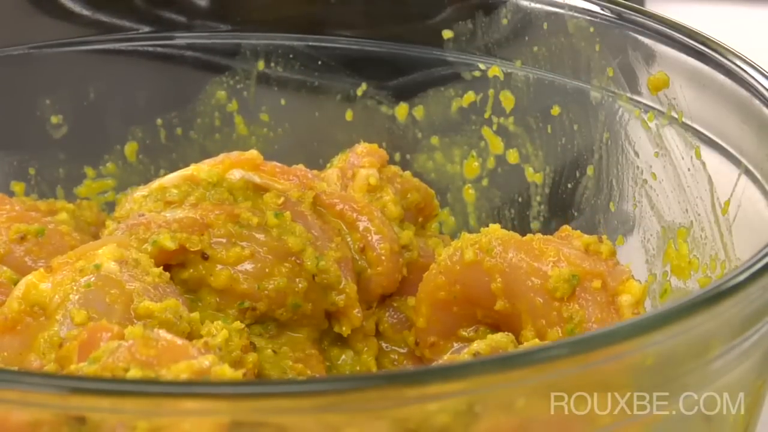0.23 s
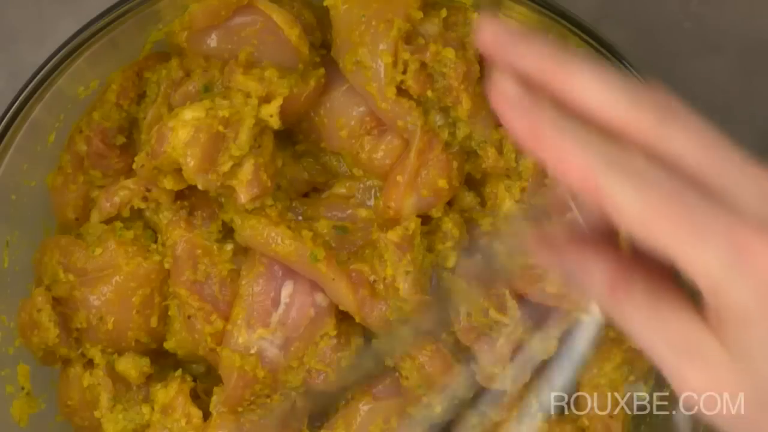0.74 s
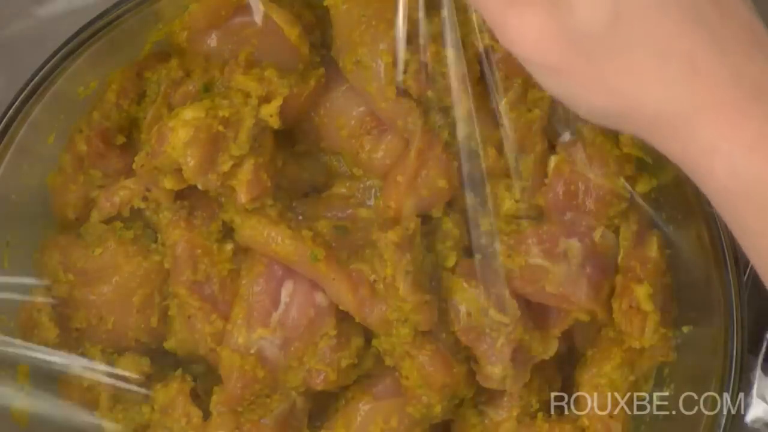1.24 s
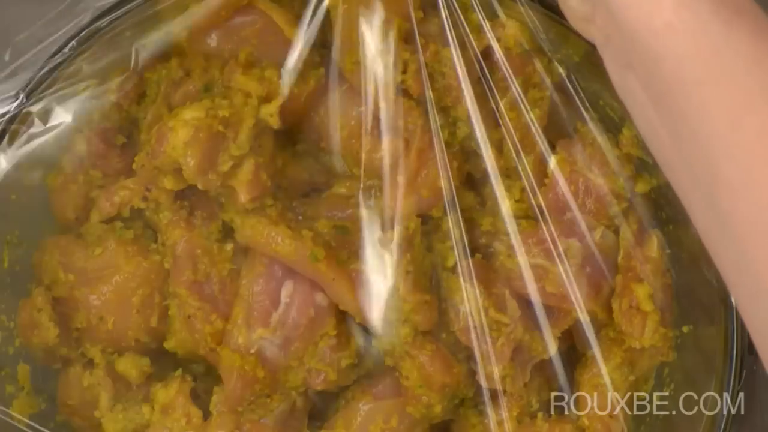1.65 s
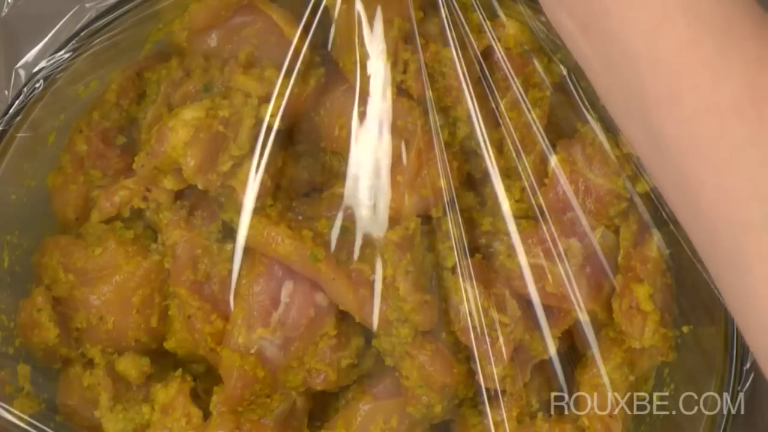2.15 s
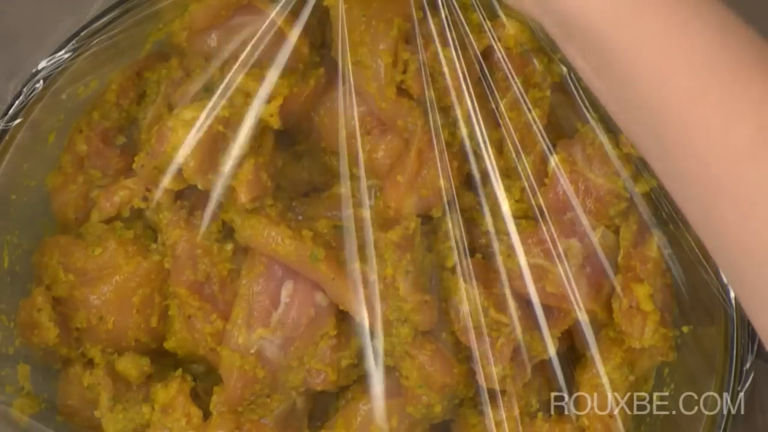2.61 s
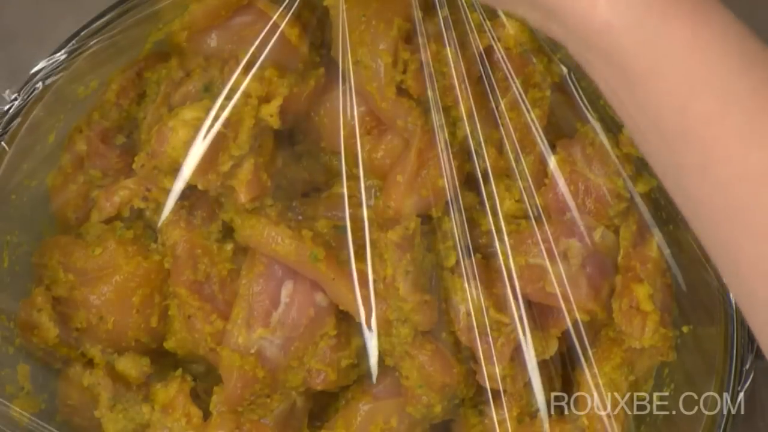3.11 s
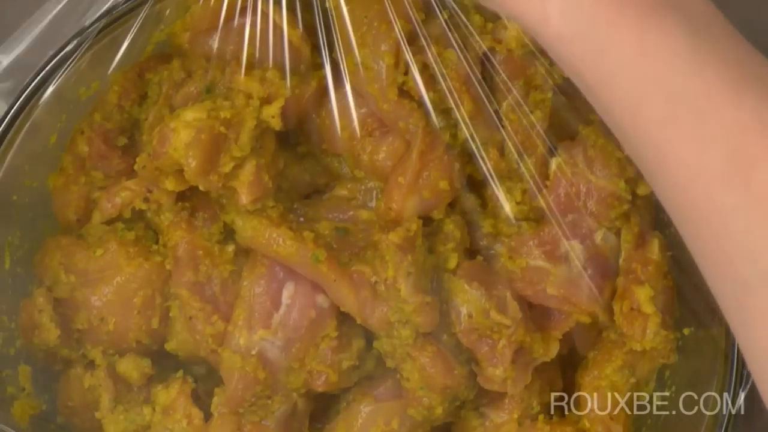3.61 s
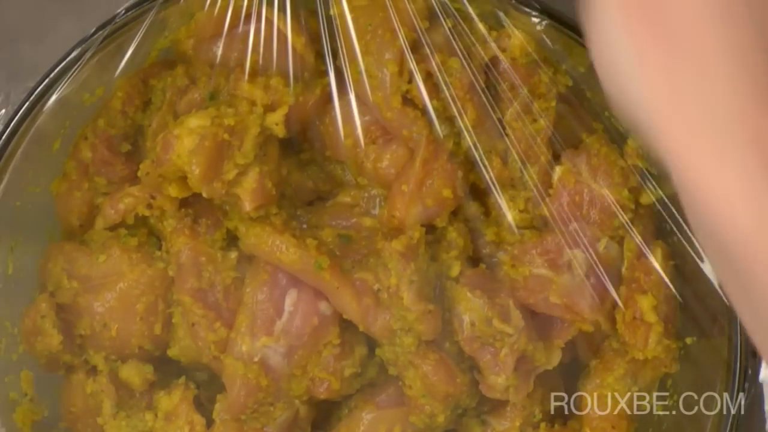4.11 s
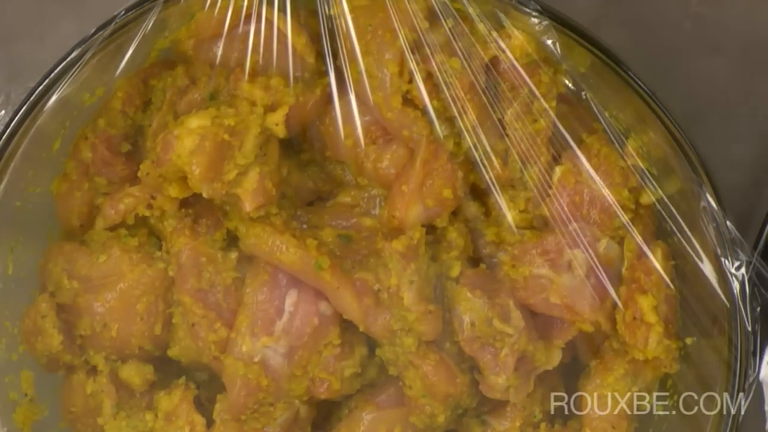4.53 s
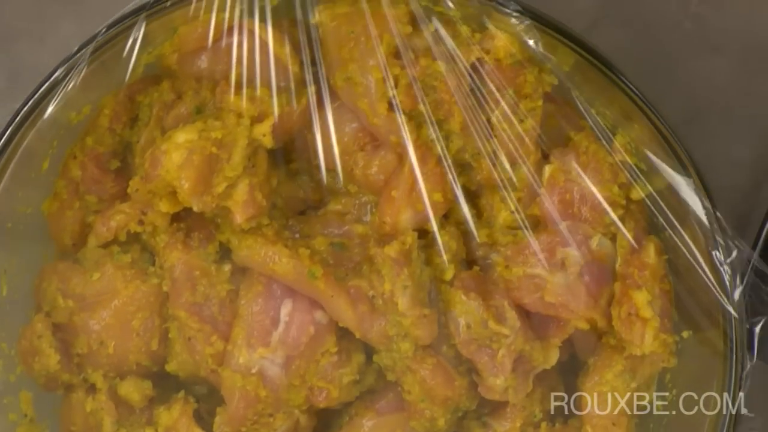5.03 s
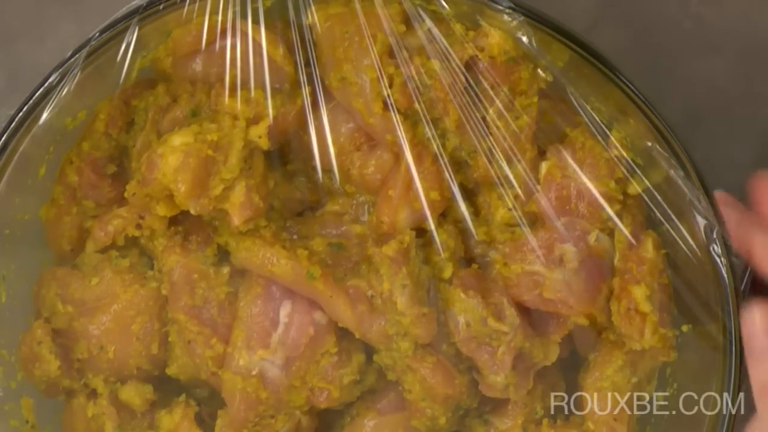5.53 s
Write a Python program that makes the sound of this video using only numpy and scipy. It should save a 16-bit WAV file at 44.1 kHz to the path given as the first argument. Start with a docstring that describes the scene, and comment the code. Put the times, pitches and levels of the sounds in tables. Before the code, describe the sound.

A quiet small kitchen, heard close to a glass bowl. For the first second there is only soft room air and fan noise, with a low rumble and hum entering near 0.4 s, plus faint moist smacks and brushes of food. From 1.3 s thin plastic film begins a light, bright crackle with small snaps. Between 2 and 2.8 s the rustling grows busier, with faint hoarse drags on the rim. After a short lull, from 3.1 s it surges; the loudest crunch, at 3.3 to 3.55 s, is a dense cluster of sharp snaps with hollow pops and a dull thump. Separate snaps follow, and the taut film booms softly like a drum at 3.9 s. A smaller flurry comes at 4.6 to 4.9 s, short twangs around 5 s, then sparse crinkles, soft bumps and very faint glass taps until the end. The room echo is short and subdued.

```python
"""A quiet kitchen: after a few soft sounds of moist food, cling wrap is pulled over a glass bowl, close by.
The film rustles in tiny random buckles; larger creases snap as noisy flips with a hollow pop, loudest at the rim.
Damped modes let the taut film answer like a slack drum skin and the glass ring; filtered noise makes
dull bumps, hoarse drags and moist smacks. Room air, a fan, a low rumble and an appliance hum lie beneath."""
import sys
import numpy as np
from scipy import signal
from scipy.fft import rfft, irfft, next_fast_len
from scipy.io import wavfile
from scipy.ndimage import map_coordinates

SR = 44100
rng = np.random.default_rng(int(sys.argv[2]) if len(sys.argv) > 2 else 0)


def unload_audio(sound):
    """Save the sound as a 16-bit wav file, at the path given as the first command line argument."""
    columns = np.transpose(np.atleast_2d(sound))
    # keep every value between -1 and 1, then stretch to whole-number steps
    steps = np.round(np.clip(columns, -1, 1) * 32767)
    wavfile.write(sys.argv[1], SR, steps.astype(np.int16))


N = 254016  # length in samples


def amp(db):
    """Decibels to gain."""
    return 10 ** (np.asarray(db) / 20)


def unit(x):
    """Scale to rms 1."""
    return x / np.sqrt(np.mean(x ** 2) + 1e-20)


def along(points, hz):
    """Read (Hz, value) points on a log frequency axis."""
    f, v = np.transpose(points)
    return np.interp(np.log(hz + 1), np.log(f + 1), v)


def curves(rows):
    """One value per sample for each column after the time."""
    s, *cols = np.transpose(rows)
    return [np.interp(np.arange(N) / SR, s, c) for c in cols]


def wobble(rate):
    """A random curve of straight segments, rate knots a second."""
    knots = rng.standard_normal(int(N * rate / SR) + 4)
    return map_coordinates(knots, [np.arange(N) * rate / SR], order=1)


def colour(x, shape_db):
    """Causal minimum-phase filter whose gain in dB is a function of frequency."""
    size = 2 * next_fast_len(len(x) // 2 + 2048, True)
    cepstrum = irfft(np.log(amp(shape_db(np.fft.rfftfreq(size, 1 / SR))) + 1e-6))
    # fold the cepstrum forward in time so that nothing sounds early
    cepstrum[1:size // 2] *= 2
    cepstrum[size // 2 + 1:] = 0
    return irfft(rfft(x, size) * np.exp(rfft(cepstrum)))[:len(x)]


def tinted(x, points):
    """x coloured by (Hz, dB) points, at rms 1."""
    return unit(colour(x, lambda hz: along(points, hz)))


def resonance_db(hz, centre, width):
    """Gain of a steep-sided resonance."""
    return -20 * np.log10(1 + ((hz ** 2 - centre ** 2) / (width * hz + 1e-6)) ** 2)


def burst(x, seconds):
    """Scale x to the energy of a unit signal of that length."""
    return x * np.sqrt(seconds * SR / (np.sum(x ** 2) + 1e-20))


def add(track, s, x):
    """Mix x into the track at time s."""
    start = max(round(s * SR), 0)
    track[start:start + len(x)] += x[:max(N - start, 0)]


def ring(modes):
    """Damped modes, at slightly new strengths and random phases for every blow."""
    t = np.arange(SR) / SR
    total = 0
    for hz, db, t60 in modes:
        decay = amp(db + rng.normal(0, 1.5) - 60 * t / t60)
        total = total + decay * np.sin(2 * np.pi * hz * t + rng.uniform(0, 2 * np.pi))
    return total


def ringing(x, modes):
    """Answer of damped modes to x, of unit energy gain."""
    answer = ring(modes)
    return signal.fftconvolve(x, answer / np.linalg.norm(answer))[:N]


# faint creak of the held film, before the trims in crinkling: time_s, crinkle_db, drum_db
HELD_CREAK = [(1.23, -87, -87), (1.29, -72, -70), (2.02, -73.5, -73), (2.45, -62, -68), (3.0, -67.5, -64.5),
              (4.1, -69.5, -63.5), (4.36, -77, -70.5), (5.4, -65.5, -65), (5.75, -66.5, -66.5)]
# pulls and presses of the hands, before the same trims: start_s, length_s, crinkle_db, drum_db
PULLS = [(1.303, 0.035, -56, -51), (1.358, .11, -60, -63), (1.53, 0.32, -60.5, -63.5),
         (1.668, 0.037, -54, -52), (1.903, 0.0081, -55.5, -66), (2.076, 0.064, -54, -60),
         (2.172, .11, -51, -60.5), (2.337, .055, -50, -58), (2.51, .11, -48.5, -56.5),
         (2.674, 0.083, -48.5, -53.5), (2.818, 0.068, -54, -58), (3.081, 0.033, -52.5, -62.5),
         (3.176, .1, -49.5, -53), (3.331, 0.11, -44, -48), (3.468, 0.024, -38.5, -40),
         (3.513, 0.12, -45.5, -44), (3.65, 0.11, -52.5, -56), (3.785, 0.029, -47, -50),
         (3.913, .09, -60.5, -62), (4.019, .06, -53.5, -70), (4.466, .16, -64, -64),
         (4.657, 0.02, -44.5, -58), (4.736, 0.14, -58, -52), (4.971, 0.072, -54, -56),
         (5.371, 0.028, -66.5, -62.5), (5.737, .03, -61, -65)]
ATTACK_S, RELEASE_S = 0.017, .024  # amplitude time constants of every pull


def handling():
    """Crinkle and drumming levels in dB: each pull takes hold, lasts and dies away over the held creak."""
    t = np.arange(N) / SR
    power = amp(curves(HELD_CREAK)) ** 2
    for s, length, crinkle_db, drum_db in PULLS:
        before, after = np.minimum(t - s, 0), np.maximum(t - s - length, 0)
        shape = np.exp(before / ATTACK_S - after / RELEASE_S)
        power = power + (amp([[crinkle_db], [drum_db]]) * shape) ** 2
    return 10 * np.log10(power)


def buckles(rate, spread_db, clump_db):
    """Random tiny impulses of widely varying size, in clumps; mean power does not depend on the rate."""
    hit = rng.random(N) < rate / SR
    scatter_db = spread_db * np.clip(rng.standard_normal(N), -2, 2)
    size_db = scatter_db + clump_db * np.clip(wobble(170), -2, 2)
    return unit(hit * np.sign(rng.standard_normal(N)) * amp(size_db) / np.sqrt(rate))


# spectrum of the film's crackle: freq_hz, gain_db
CRINKLE_COLOUR = [(200, -20), (600, -14), (1400, -1.5), (2000, -1), (2500, -3), (3200, -4.5), (4200, -3.5),
                  (5400, -2.5), (7500, -1), (10000, -2), (13000, -4), (16000, -7.5)]
# spectrum of the drumming sheet: freq_hz, gain_db
DRUM_COLOUR = [(60, -27.5), (200, -5), (350, -3), (550, 5), (800, 1.5), (1100, 5), (1500, -2.5),
               (2200, -4.5), (3500, -28), (8000, -64.5)]
# gain of the finest crackle, which fades as the film is smoothed down: time_s, gain_db
SHEEN_GAIN = [(1.3, 3), (3.5, -.5), (4.1, 3.5), (4.6, -6), (5.7, -11)]
SHEEN_HZ = 9800  # the finest buckles sound above this
# buckle rate at that crinkle level; it doubles with every step louder
BUCKLES_PER_S, BUCKLES_AT_DB, DOUBLING_DB = 2600, -50, 7


def crinkling(crinkle_db, drum_db):
    """Tiny buckles crackle and set the whole sheet drumming."""
    rate = BUCKLES_PER_S * 2 ** ((crinkle_db - BUCKLES_AT_DB) / DOUBLING_DB)
    sheen_db, = curves(SHEEN_GAIN)
    grains = buckles(rate, spread_db=4.5, clump_db=4.5)
    # facets of different sizes each favour their own pitch
    facets = 0
    for centre in (1980, 4270, 6810, 9500, 13000):
        facet = buckles(rate / 4, spread_db=5.5, clump_db=3.5)
        facets = facets + unit(colour(facet, lambda hz: resonance_db(hz, centre, centre * .8)))
    # the film clings to the glass and lets go in quick, uneven slips
    slips = unit(amp(2.8 * np.clip(wobble(110), -2, 1.5)))
    crackle = slips * (grains + amp(-11) * facets)
    fizz = tinted(crackle + amp(-8) * rng.standard_normal(N), CRINKLE_COLOUR)
    # coarser folds carry less of the top sheen
    highpass = signal.butter(2, SHEEN_HZ, "high", fs=SR, output="sos")
    fizz = fizz + (amp(sheen_db) - 1) * signal.sosfiltfilt(highpass, fizz)
    drum = tinted(slips * grains + amp(-5.5) * rng.standard_normal(N), DRUM_COLOUR)
    return amp(crinkle_db - 1.0) * fizz + amp(drum_db - 4.5) * drum


# large creases that snap: start_s, level_db, pop_db (relative to the crack), crease_hz (its resonance)
LARGE_CREASES = [(1.3629, -49, -31, 8800), (1.406, -54, -20, 8500), (1.456, -54, -14, 8000),
                 (1.548, -49.5, -17, 7100), (1.561, -50.5, -14, 7500), (1.672, -43.5, -6, 8500),
                 (1.6826, -50, 2.5, 8200), (1.7389, -50, -22, 2800), (1.7992, -53, -18, 6740),
                 (1.818, -50, -8, 8000), (1.9597, -53.5, -18, 13700), (2.0183, -60, -16, 5900),
                 (2.3743, -39.5, -29, 12200), (2.4974, -50.5, -26, 10000), (2.6158, -44, -26, 9300),
                 (2.677, -48, -1.5, 9000), (2.704, -44, -12, 7500), (2.7135, -44, -3.5, 10500),
                 (2.7651, -40.5, -33, 11600), (3.106, -44, -25, 9200), (3.1695, -38.5, -8.5, 6650),
                 (3.237, -41.5, -27, 9500), (3.2981, -37, -7, 4240), (3.3003, -31, -8, 4400),
                 (3.3192, -34, -4, 4000), (3.3317, -30.5, -9, 2300), (3.338, -25, -2.5, 9400),
                 (3.38, -34.5, -25, 8800), (3.392, -33.5, -1, 2180), (3.405, -21, -10, 6300),
                 (3.432, -35.5, -20, 7300), (3.4625, -17.5, -5, 5200), (3.4809, -33.5, -8, 2700),
                 (3.4972, -33, -17, 10600), (3.5006, -26, -1, 10600), (3.5382, -26, -6, 5930),
                 (3.6951, -36.5, -11, 6400), (3.7902, -41, -1.5, 2680), (3.8053, -39, -16, 5700),
                 (3.8962, -32.5, -6, 7900), (4.055, -39, -27.5, 10400), (4.0722, -37.5, -8, 5770),
                 (4.5865, -44.5, -5, 8700), (4.6169, -45.5, -13, 7660), (4.642, -41, -17, 6900),
                 (4.6472, -35, -10.5, 3300), (4.6559, -32.5, -13, 2980), (4.6586, -32, -7.5, 6740),
                 (4.6839, -43, -3.5, 8350), (4.7304, -47.5, -1, 8300), (4.7382, -40, -3.5, 9200),
                 (4.7983, -47.5, -5.5, 8100), (4.8345, -37, -4, 7600), (4.884, -48.5, 0, 1880),
                 (4.9546, -51, -16, 8870), (4.9715, -42.5, -12, 2280), (4.9942, -44.5, -14, 2500),
                 (5.0199, -44.5, -6, 2900), (5.0321, -45, -13, 3180), (5.2644, -42, -10.5, 9100),
                 (5.7439, -48, -12, 10900)]
# spectrum of the crack: freq_hz, gain_db
CRACK_COLOUR = [(100, -29), (500, -7), (1100, -6.5), (1600, -9.5), (2600, -2.5), (3400, -6.5), (4300, 0),
                (5100, -3), (7000, -2), (9000, -2), (12000, -6), (16000, -7.5)]
# spectrum of the hollow pop: freq_hz, gain_db
POP_COLOUR = [(80, -25), (250, -10.5), (450, 0.5), (750, 0.5), (1050, 2.5), (1350, 0), (1700, -4),
              (3000, -4.5), (8000, -59.5)]
# bass edge of the pop at that snap level; it falls an octave with every step, so strong snaps reach deeper
POP_LOW_HZ, POP_LOW_AT_DB, POP_OCTAVE_DB = 300, -25, 24.5
# time constant of the slip run from that level up; weaker creases flip faster
FLIP_S, FLIP_AT_DB, FLIP_DOUBLING_DB = .00056, -30, 40


def snaps(creases):
    """A crease flips in a run of slips about a millisecond long; a hollow pop rattles round the bowl."""
    out, t = np.zeros(N), np.arange(4096) / SR
    for s, db, pop_db, crease_hz in creases:
        slip, scatter, hollow = rng.standard_normal((3, len(t)))
        flip_s = FLIP_S * 2 ** (min(db - FLIP_AT_DB, 0) / FLIP_DOUBLING_DB)
        run = t / flip_s
        flip = slip * np.abs(slip) ** .3 * run * np.exp(-run)
        crack = burst(flip, 1) + amp(-4.0) * burst(scatter * amp(-60 * t / 0.026), 0.76)
        # the crease's own resonance lifts the crack by up to 9 dB
        crack = colour(crack, lambda hz: along(CRACK_COLOUR, hz)
                       + 9 / (1 + ((hz - crease_hz) / (0.11 * crease_hz)) ** 2))
        pop = hollow * (amp(-60 * t / 0.032) + amp(-9.0) * amp(-60 * t / 0.063))
        low_hz = POP_LOW_HZ * 2 ** ((POP_LOW_AT_DB - db) / POP_OCTAVE_DB)
        pop = colour(pop, lambda hz: along(POP_COLOUR, hz) - 10 * np.log10(1 + (low_hz / (hz + 1)) ** 4))
        add(out, s, amp(db) * (burst(crack, 0.0044) + amp(pop_db) * burst(pop, 0.0045)))
    return out


SMALL_PER_S, SMALL_OVER_DB = 22, 2.5  # rate; level over the untrimmed crinkle
SMALL_MAX_DB, SMALL_SPREAD_DB = -48, 3  # ceiling before scatter; scatter
SMALL_POP_DB, SMALL_HZ, SMALL_OCTAVES = -15.5, 8300, .4  # relative pop; typical resonance and its scatter


def small_snaps(crinkle_db):
    """Rows for snaps(): small creases at random times, whose strength follows the crinkle."""
    count = int(SMALL_PER_S * N / SR)
    draws = np.clip(rng.standard_normal((1000, 3))[:count], -1.7, 1.7)
    places = rng.integers(N, size=1000)[:count]
    rows = []
    for i, (size, hollow, pitch) in zip(places, draws):
        level_db = min(crinkle_db[i] + SMALL_OVER_DB, SMALL_MAX_DB) + SMALL_SPREAD_DB * size
        crease_hz = SMALL_HZ * 2 ** (SMALL_OCTAVES * pitch)
        rows.append((i / SR, level_db, SMALL_POP_DB + 5 * hollow, crease_hz))
    return rows


# hoarse squeals of film dragging on the rim: centre_s, level_db, half_length_s, pitch_hz
DRAGS = [(2.199, -62.5, 0.031, 1980), (2.366, -61, 0.017, 2130), (2.585, -61, 0.032, 1920),
         (2.721, -61, 0.028, 1920)]


def drags():
    """Rubbing on the glass sounds one broad resonance of the taut film."""
    out, t = np.zeros(N), np.arange(SR // 3) / SR
    for s, db, half, pitch_hz in DRAGS:
        squeal = unit(colour(rng.standard_normal(len(t)), lambda hz: resonance_db(hz, pitch_hz, 390)))
        swell = np.exp(-.5 * ((t - t.mean()) / half) ** 2)
        add(out, s - t.mean(), amp(db) * squeal * swell)
    return out


# modes of the film stretched over the bowl: freq_hz, level_db, t60_s
SKIN_MODES = [(380.5, -1, 0.084), (479, -3, 0.061), (668, -4.5, 0.1), (937, -4.5, 0.059),
              (1075, 0.5, 0.086), (1110, -12, 0.17), (1510, -5, 0.042)]


def skin_answer(film):
    """The taut film answers its own noise like a slack drum skin."""
    return amp(-21.5) * ringing(film, SKIN_MODES)


# taut film plucked as it lets go of the rim: start_s, level_db
PLUCKS = [(4.9722, -40), (4.9943, -43), (5.02, -41.5), (5.265, -59)]
# tones of the plucked film: freq_hz, level_db, t60_s
TAUT_MODES = [(722, -1.5, 0.052), (927, -1.5, 0.078), (1436, 6, 0.021), (1590, -6, 0.029),
              (2400, -2, 0.013), (2680, -11, 0.018), (3140, -7.5, 0.032)]


def plucks():
    """Taut film twangs off the rim in short damped tones."""
    out = np.zeros(N)
    for s, db in PLUCKS:
        add(out, s, amp(db) * burst(ring(TAUT_MODES), 0.009))
    return out


# tones of the sealed film: freq_hz, level_db, t60_s
HEAD_MODES = [(256, 0, 0.13), (447, -1, 0.1), (619, -14, 0.13), (700, -10, 0.11), (942, -16, 0.17)]
BOOM_S, BOOM_DB = 3.905, -43  # start and level


def boom():
    """The film booms once like a drum head as it seals."""
    out = np.zeros(N)
    add(out, BOOM_S, amp(BOOM_DB) * burst(ring(HEAD_MODES), 0.013))
    return out


# modes of the undamped glass bowl: freq_hz, level_db, t60_s
GLASS_MODES = [(1046, -4.5, .7), (2515, 2, 0.75), (2735, -2.5, .6), (2915, -4.5, .8), (3500, 1, .6),
               (3984, -3, .5), (4226, -8.5, 0.41), (4730, -2.5, .5)]


def glass_answer(film):
    """The glass bowl rings faintly with the film's noise."""
    return amp(-35.0) * ringing(film, GLASS_MODES)


# fingertips that make the glass ring: start_s, level_db
TAPS = [(5.135, -68.5), (5.586, -68.5), (5.713, -62.5)]


def taps():
    """Fingers touch the glass softly and damp its ring at once."""
    out, t = np.zeros(N), np.arange(SR) / SR
    touch = amp(-60 * t / 0.31) * (1 - np.exp(-t / 0.0028))
    for s, db in TAPS:
        add(out, s, amp(db) * burst(ring(GLASS_MODES) * touch, 0.023))
    return out


# soft bumps of hand and film on the bowl: start_s, level_db, pitch_hz, t60_s (of the push)
BUMPS = [(0.433, -59.5, 260, 0.038), (1.328, -54, 500, .12), (2.801, -55, 120, 0.12),
         (3.469, -33, 540, 0.18), (3.662, -54, 390, 0.077), (3.67, -57, 115, 0.13),
         (3.784, -51.5, 260, 0.27), (3.904, -37.5, 290, 0.047), (4.133, -52, 600, 0.18),
         (4.238, -58, 130, 0.19), (4.757, -47, 348, 0.18), (4.839, -42.5, 623, 0.17),
         (4.849, -48.5, 199, 0.37), (5.006, -53, 199, 0.12), (5.11, -58, 278, 0.082),
         (5.172, -49.5, 380, 0.044), (5.185, -57.5, 65.4, 0.17), (5.514, -60, 135, 0.27),
         (5.72, -57.5, 400, 0.12)]


def bumps():
    """Soft contacts give short, dull thumps of resonant noise."""
    out, t = np.zeros(N), np.arange(SR // 4) / SR
    for s, db, pitch_hz, t60 in BUMPS:
        push = rng.standard_normal(len(t)) * amp(-60 * t / t60)
        thump = colour(push, lambda hz: resonance_db(hz, pitch_hz, 1.3 * pitch_hz))
        add(out, s, amp(db) * burst(thump, 0.0082))
    return out


# soft moist smacks and brushes: centre_s, level_db, half_length_s
BRUSHES = [(0.07, -67, 0.0014), (0.457, -74.5, .015), (0.471, -61.5, 0.0013), (0.68, -61, 0.023),
           (0.816, -77, 0.011), (1.016, -72, 0.0079)]
# faint hiss of food being folded: time_s, level_db
FOLDING = [(0, -70.5), (.1, -70.5), (.25, -72.5), (.36, -89), (.9, -96), (1.1, -77), (1.3, -72),
           (1.5, -100)]
# spectrum of the moist hiss: freq_hz, gain_db
MOIST_COLOUR = [(300, -23), (1100, 12), (1700, -5), (2600, -0.5), (3800, -7), (4900, 2), (6200, -17),
                (15000, -20.5)]


def food():
    """Moist pieces smack in swells of dense crackle and slide with a faint hiss."""
    t = np.arange(N) / SR
    strokes = sum(amp(db) * np.exp(-.5 * ((t - s) / half) ** 2) for s, db, half in BRUSHES)
    smacks = strokes * tinted(buckles(rate=12000, spread_db=4.0, clump_db=3.5), CRINKLE_COLOUR)
    return smacks + amp(curves(FOLDING)[0]) * tinted(rng.standard_normal(N), MOIST_COLOUR)


# decay of the kitchen's echo: freq_hz, t60_s
KITCHEN_DECAY = [(100, .3), (500, 0.35), (2000, 0.25), (6000, 0.12), (16000, 0.19)]


def kitchen(x):
    """Diffuse room tail; each short stretch of sound excites it differently."""
    out, size = np.zeros(N), 4096
    for start in range(0, N, size):
        hz, t, z = signal.stft(rng.standard_normal(SR // 3), SR, nperseg=256)
        decay = amp(-60 * t / along(KITCHEN_DECAY, hz)[:, None])
        onset = 1 - np.exp(-t / 0.0014)
        tail = signal.istft(z * decay * onset, SR, nperseg=256)[1]
        add(out, start / SR, signal.fftconvolve(x[start:start + size], tail / np.linalg.norm(tail)))
    return out


# appliance hum, whose level wavers around these: freq_hz, level_db, until_s (after a 0.2 s fade)
HUM_TONES = [(65, -84, 7.5), (125, -78.5, 6), (139, -76, 2.96), (188, -81, 5.5)]


def hum():
    """Steady-pitched tones waver slowly in level and phase."""
    t = np.arange(N) / SR
    total = np.zeros(N)
    for hz, db, until in HUM_TONES:
        level = amp(db + 0.99 * wobble(2.5)) * np.sqrt(2)  # a sine's rms to its peak
        tone = np.sin(2 * np.pi * hz * t + .3 * wobble(1.5))
        total += level * tone * np.clip((until - t) / 0.2, 0, 1)
    return total


# resonances of the fan: freq_hz, width_hz (before narrowing to 0.91), level_db
FAN_BANDS = [(1146, 280, -75), (1640, 240, -73), (2380, 380, -81), (2870, 780, -82.5)]


def fan():
    """Steady noise through a few broad resonances."""
    total = np.zeros(N)
    for centre, width, db in FAN_BANDS:
        noise = rng.standard_normal(N)
        total += amp(db) * unit(colour(noise, lambda hz: resonance_db(hz, centre, 0.91 * width)))
    return total


# spectrum of the room air: freq_hz, gain_db
AIR_COLOUR = [(20, -21), (100, -5), (300, -10.5), (600, -5), (1400, -9.5), (2500, -13), (4000, -17),
              (7000, -20.5), (12000, -22.5), (16000, -20.5)]
# spectrum of the low rumble: freq_hz, gain_db
RUMBLE_COLOUR = [(20, -7.5), (60, -3.5), (100, -11), (170, -2.5), (330, -2.5), (600, -9.5), (1200, -16),
                 (4000, -44.5)]
HUM_START_S = .44  # hum and rumble fade in from here


def background():
    """Room air as coloured noise and a fan; a low noise rumble and an unsteady hum join them."""
    t = np.arange(N) / SR
    air = amp(-71.5) * tinted(rng.standard_normal(N), AIR_COLOUR)
    rumble = amp(-74) * tinted(rng.standard_normal(N), RUMBLE_COLOUR)
    return air + fan() + (hum() + rumble) * np.clip((t - HUM_START_S) / 0.018, 0, 1)


def scene():
    """Film, bowl and room at one microphone."""
    crinkle_db, drum_db = handling()
    film = crinkling(crinkle_db, drum_db) + snaps(LARGE_CREASES) + drags() + snaps(small_snaps(crinkle_db))
    contacts = plucks() + boom() + taps() + bumps()
    near = film + skin_answer(film) + glass_answer(film) + contacts + food()
    room_gain = [(300, -11.5), (1200, -14), (4000, -12), (12000, -27.0)]  # (Hz, dB)
    room = colour(kitchen(near), lambda hz: along(room_gain, hz))
    return (near + room + background())[None]


TOP_HZ = 16050  # band limit


def record(dry):
    """A sharp spectral cut keeps nothing above the band limit."""
    size = next_fast_len(N + 4096)
    return irfft(rfft(dry, size) * (np.fft.rfftfreq(size, 1 / SR) < TOP_HZ), size)[:, :N]


dry = scene()
out = record(dry)
unload_audio(out)
```